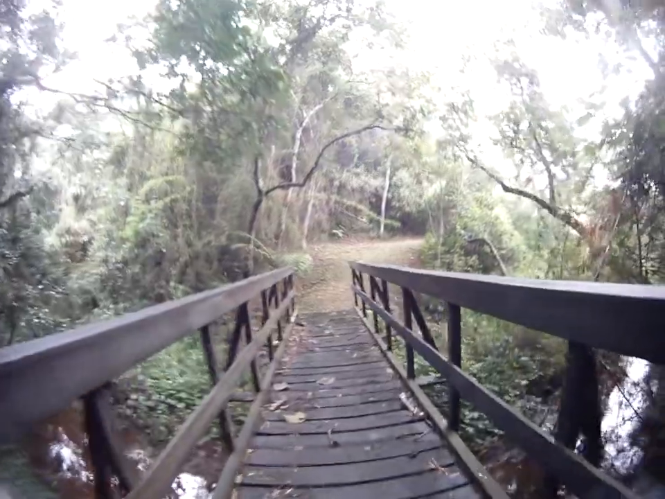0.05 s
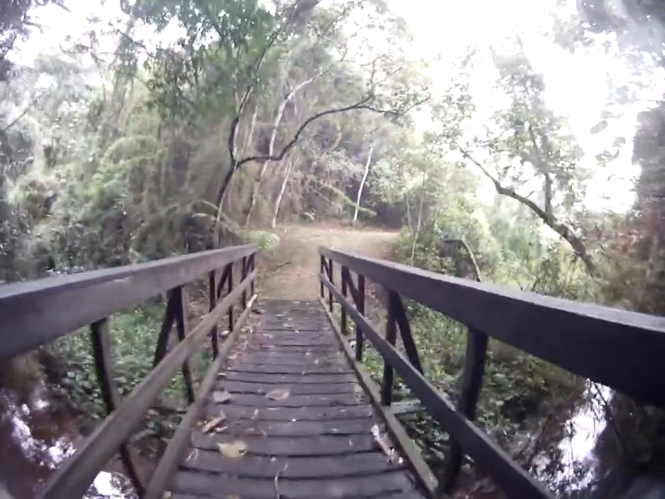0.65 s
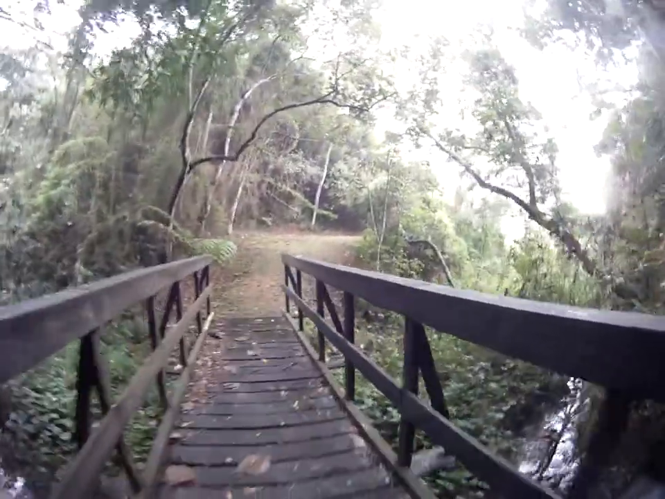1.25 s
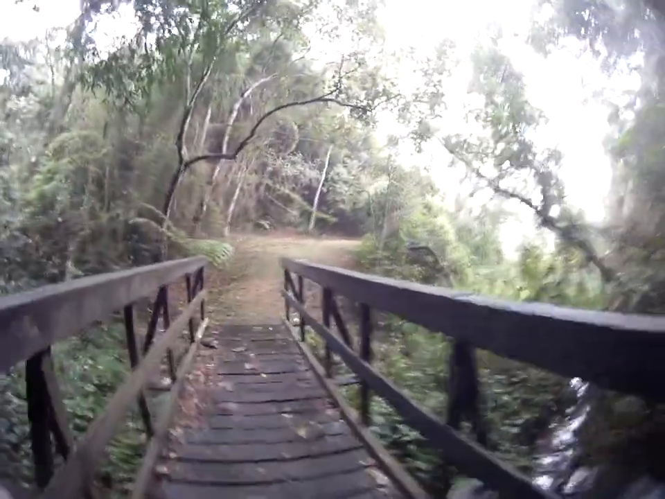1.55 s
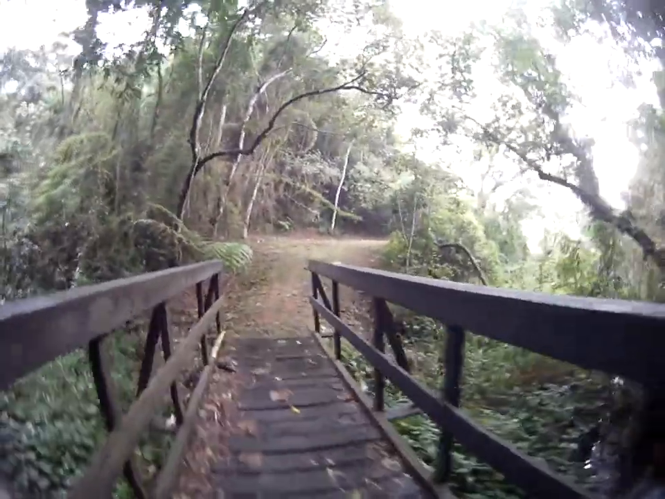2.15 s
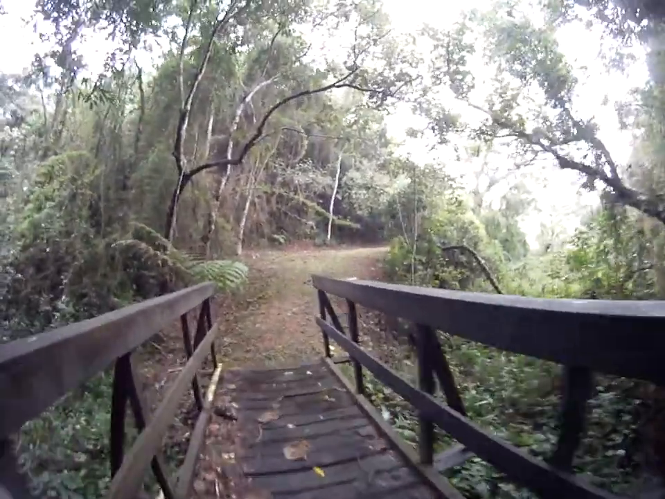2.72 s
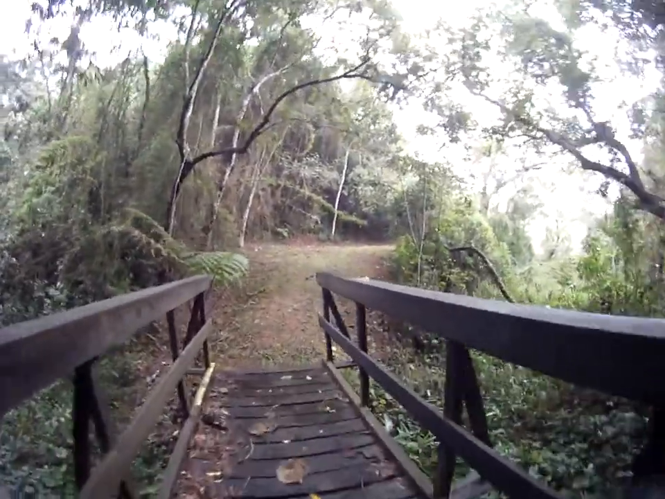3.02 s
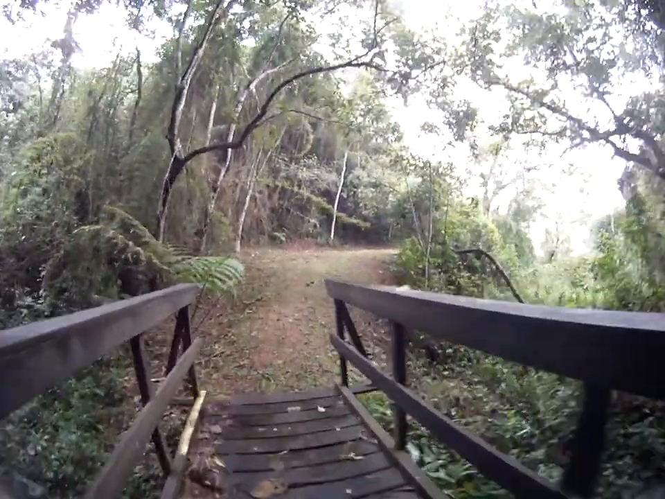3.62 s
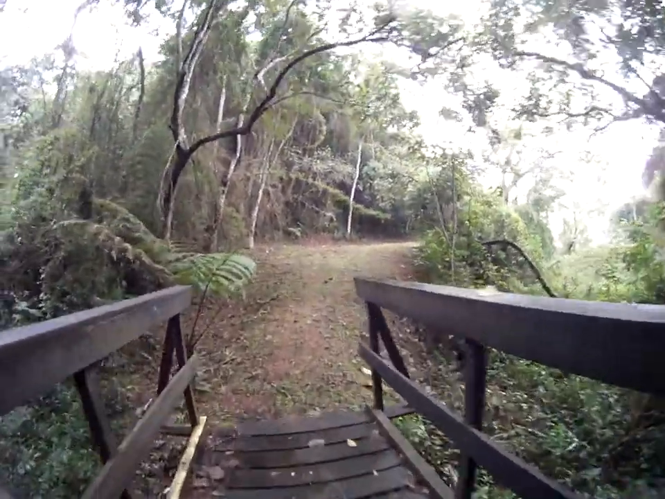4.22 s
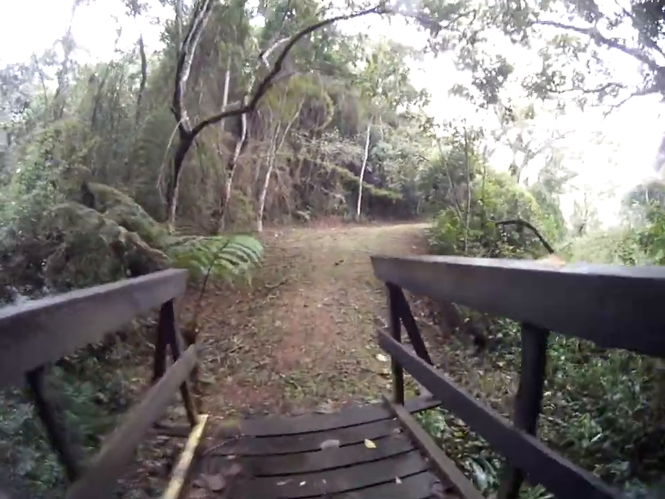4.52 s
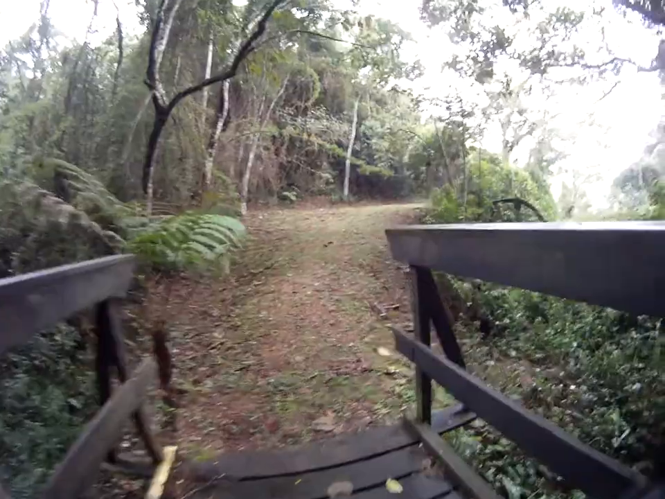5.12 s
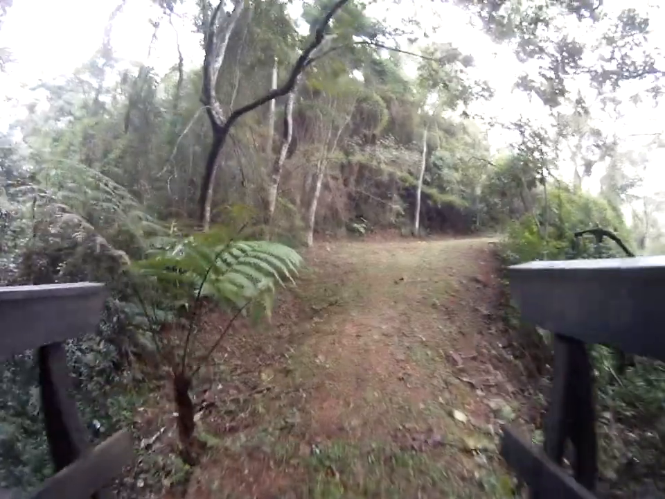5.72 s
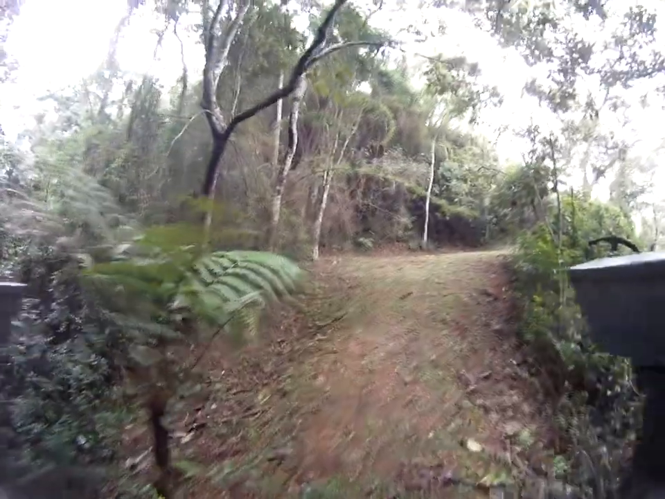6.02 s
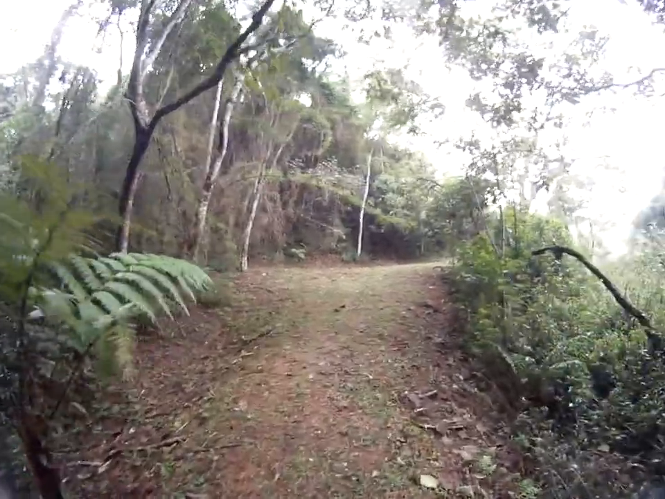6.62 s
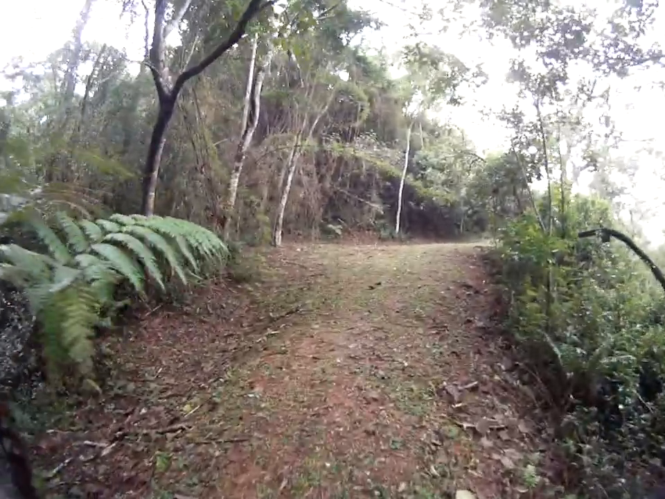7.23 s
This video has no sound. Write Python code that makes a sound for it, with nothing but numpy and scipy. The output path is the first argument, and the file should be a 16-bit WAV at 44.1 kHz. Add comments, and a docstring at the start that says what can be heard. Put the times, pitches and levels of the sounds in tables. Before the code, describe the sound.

Low rumble and faint rubbing open the sound, close at the microphone of a small camera moving over a wooden forest footbridge. A soft thud comes at about 0.5 seconds, then hard clatter from the housing and mount, and a heavier thud at 0.9. Each uneven plank gives a sharp knock with quick rebounds and a faint wooden ring. Clattering bursts follow around 1.5, 1.9, 2.5, 2.9 to 3.3, and 3.9 seconds, with gritty scuffs and an occasional small squeak between them. The loudest stretch runs from about 4.1 to 5.1 seconds: low thuds, sharp knocks, swelling rumble and a brief groan of the gear. Lighter taps and short, faint squeaks follow until 5.7. One last low thump lands at about 6.1 on the dirt trail. After that only soft rumble, slight rubbing and the faint steady hiss remain, until about 7.3 seconds.

```python
"""Low rumble and faint rubbing come first, then a thud and a close, hard clatter: a small camera
travels over a wooden footbridge in a forest and onto a dirt trail, heard at its own microphone.
Each uneven plank sets housing and mount clattering, one blow and quick rebounds; the planks ring
faintly. Bigger bumps shake the mount with a low thud. Between them the gear rubs and squeaks,
with a faint hiss behind it all."""
import sys
import numpy as np
from scipy import signal
from scipy.fft import rfft, irfft
from scipy.io import wavfile

SR = 44100
rng = np.random.default_rng(int(sys.argv[2]) if len(sys.argv) > 2 else 0)


def store_wav(level_fs):
    """Save 16-bit WAV to argv[1]."""
    pcm = np.round(np.clip(np.atleast_2d(level_fs), -1, 1) * 32767)
    wavfile.write(sys.argv[1], SR, pcm.T.astype(np.int16))


N = 320166

# knocks on the housing: t/s, level/dB, hardness/(dB per octave), favoured f/Hz, rebound hold/s, fade/s
KNOCKS = [(0.494, -50.5, -2, 440, 0, .004), (0.6333, -24.5, -3, 1045, 0.0016, 0.077),
          (0.7721, -23.5, 2.5, 960, 0.013, 0.0086), (0.7916, -19.5, 2.5, 3180, 0.0053, 0.014),
          (0.898, -30, -4.5, 1300, 0.0063, .015), (1.0702, -42, -5.5, 2000, 0.0022, 0.013),
          (1.434, -23, 2.5, 1170, 0.013, 0.01), (1.4546, -21, 1.5, 3140, 0.0043, 0.019),
          (1.642, -38.5, -2.5, 790, 0.019, 0.024), (1.7314, -46, -3, 756, 0, 0.011),
          (1.89, -37, -1.5, 910, 0.0019, 0.011), (1.8962, -23.5, 2, 940, 0, 0.039),
          (1.9306, -18.5, 3, 2120, 0.021, 0.0096), (2.398, -23.5, -1.5, 1890, 0.009, 0.028),
          (2.54, -42.5, -10, 940, 0.022, 0.037), (2.5608, -18.5, -0.5, 1700, 0.0047, 0.021),
          (2.588, -25, 0.5, 1980, 0.004, 0.037), (2.7113, -37.5, 1.5, 2350, 0, 0.046),
          (2.8729, -23, -15, 1410, 0.0014, 0.0094), (2.977, -41.5, 4, 2080, 0.0043, .005),
          (2.9956, -31.5, 2, 1060, .02, 0.02), (3.0848, -38, 0, 2150, 0.0058, 0.055),
          (3.1155, -21.5, -0.5, 1610, 0.0052, 0.02), (3.1703, -29.5, 0.5, 2000, 0, 0.021),
          (3.191, -26.5, -6, 940, 0.0049, 0.025), (3.2865, -30, 2, 974, 0.0049, 0.027),
          (3.8338, -35.5, -3, 1900, 0.018, 0.028), (3.8674, -23, -0.5, 2000, 0.0083, 0.017),
          (4.086, -35.5, -3.5, 1230, 0, 0.0033), (4.1448, -43.5, -1.5, 1340, 0.00085, 0.055),
          (4.3434, -36.5, -7.5, 1320, 0.003, 0.0023), (4.428, -39, -7.5, 540, 0.00057, 0.0068),
          (4.4678, -13, 1, 2303, 0.0043, .002), (4.6692, -31.5, -0.5, 1415, 0.011, 0.037),
          (4.8094, -20, -7, 1010, 0.0054, 0.0042), (4.825, -16.5, 0, 1050, 0.011, 0.027),
          (5.0289, -17, 0, 1420, .001, 0.031), (5.048, -29, -1.5, 1080, 0.012, 0.082),
          (5.1909, -42.5, -2.5, 776, 0.0055, .005), (5.273, -36, -0.5, 1010, 0.0033, 0.0061),
          (5.4845, -33, -4, 1080, 0.011, 0.033), (5.591, -43.5, 2, 1130, 0.018, 0.012),
          (6.1431, -36.5, -7.5, 353, 0.0026, 0.0073)]
# ring of housing and mount at every contact: f/Hz, level/dB, t60/s
HOUSING_MODES = [(210, -22.5, 0.07), (334.6, -15.5, 0.059), (518.7, -12.5, 0.082), (793.7, -7, 0.067),
                 (869, -3, 0.028), (967, -4, 0.05), (1128, -5, 0.035), (1320, -5.5, 0.031),
                 (1540, -1.5, 0.022), (1848, -10, 0.058), (2000, -1, .04), (2270, 1.5, 0.016),
                 (2470, -8, 0.028), (2623, -11.5, 0.032), (3067, -12, 0.049), (3438, -10, 0.018),
                 (3648, -16.5, 0.021), (4196, -30, 0.015), (8600, -17, 0.03), (9300, -18.5, 0.026),
                 (9800, -14.5, 0.041), (10020, -12, .028), (10100, -14, 0.029), (10760, -19.5, 0.064),
                 (12740, -24, 0.019), (14800, -14.5, 0.031), (14350, -25, .028), (15200, -29, 0.035)]
# dense, quickly dying part of a contact: f/Hz, level/dB
CRACK_SPECTRUM = [(100, -24), (680, -23), (850, -5.5), (2200, -3.5), (3500, -21), (4400, -26), (6200, -31),
                  (8000, -28.5), (9800, -14), (11100, -18), (12000, -51), (13000, -12), (14600, -17.5),
                  (15900, -46.5)]
# jolts to the mount: t/s, level/dB, pitch factor, sharpness/dB (added to upper modes and snap)
BUMPS = [(0.418, -26.5, 1.03, -4), (0.498, -26, 0.99, 3.5), (0.901, -14, 1.04, -7), (1.552, -29, 0.97, 7),
         (2.475, -28, 0.78, -14), (2.849, -35, 1.2, 21), (2.875, -34, 1.2, 33.5), (3.199, -31, 1.11, 30),
         (3.244, -42, 1.2, 28), (4.0879, -17, 0.887, 10.5), (4.3511, -8.5, 0.95, -13.5),
         (4.472, -15, 1.05, 3), (4.702, -26, 1.3, 11), (4.836, -12.5, 1.04, 5), (5.127, -28, 1.07, 6),
         (5.185, -56, 0.64, 3), (5.271, -26.5, 1.17, -16), (5.598, -31.5, 1, 5), (6.1472, -11, 1.02, -1)]
# the mount's sway: f/Hz, level/dB, t60/s
MOUNT_MODES = [(58, -34, 0.32), (88.6, -3, 0.15), (163, -20, 0.039), (205.4, -22, 0.043), (355, -30, 0.079)]
# thin metallic ring in the mount: f/Hz, level/dB, t60/s
METAL_MODES = [(11910, -40, 0.11), (12090, -41, .16)]
# bright snap of a sharp jolt: f/Hz, level/dB
SNAP_SPECTRUM = [(100, -52), (8000, -36.5), (10000, -10.5), (11000, 0), (13800, -9), (14800, -13),
                 (16000, -38)]
# planks set ringing under the camera: t/s, level/dB, pitch factor
PLANK_HITS = [(.65, -44, 0.92), (.795, -37, 1.02), (1.45, -42, 1.1), (1.655, -51, 0.9), (1.735, -53.5, 1),
              (1.944, -37, 1.02), (2.405, -47, 0.85), (2.565, -40, 1.04), (3.125, -39.5, 0.96),
              (3.295, -53, 1.1), (3.872, -39, 1.06), (5.06, -40, 0.88)]
# a plank's ring: f/Hz, level/dB, t60/s
PLANK_MODES = [(332.5, -4, 0.35), (526, -32.5, 0.16), (830, 1.5, 0.22), (1010, -22, 0.3),
               (1340, -19.5, 0.22), (2010, -9.5, 0.15)]
# how much the moving gear rubs: t/s, level/dB
RUB_LEVELS = [(0.0, -61), (0.32, -65.5), (0.68, -65), (0.83, -53.5), (1.32, -61), (1.82, -59.5),
              (2.02, -65), (2.44, -65.5), (3.14, -55), (3.29, -61), (3.65, -66), (4.72, -56), (4.88, -70.5),
              (5.06, -56.5), (6.1, -67)]
# gritty scuffs of strap and mount: t/s, length/s, level/dB
SCUFFS = [(0.063, 0.18, -59), (0.308, 0.11, -68.5), (0.893, 0.31, -56.5), (1.592, 0.062, -52.5),
          (1.656, 0.15, -60), (2.167, 0.15, -57), (2.509, 0.066, -43.5), (2.742, 0.037, -49.5),
          (2.86, 0.096, -58), (3.135, 0.088, -38), (3.516, 0.077, -56), (3.636, 0.056, -51.5),
          (4.4, 0.25, -53.5), (4.877, 0.087, -50.5), (5.204, 0.19, -54), (5.539, 0.095, -51),
          (5.664, 0.048, -49), (6.99, 0.29, -70.5)]
# squeaks and groans of the gear: t/s, length/s, level/dB, first f/Hz, last f/Hz
SQUEAKS = [(0.11, 0.073, -58, 1010, 870), (1.463, 0.075, -47.5, 930, 810), (4.149, 0.056, -61, 1250, 1430),
           (4.66, 0.13, -42, 193.4, 163.4), (5.115, 0.087, -47, 777, 948), (5.565, 0.042, -49, 967, 1207),
           (5.656, 0.0775, -49, 813, 1036), (5.712, 0.062, -52.5, 1003, 957), (7.047, 0.076, -65, 910, 776),
           (7.181, 0.04, -57.5, 950, 1010)]
# roughness of the way, heard as rumble: t/s, level/dB
RUMBLE_LEVELS = [(0.0, -52.5), (0.46, -57.5), (0.62, -52), (0.99, -44), (1.37, -55.5), (1.86, -51),
                 (2.3, -55.5), (2.91, -49.5), (3.58, -59.5), (4.12, -56), (4.53, -38.5), (4.85, -53.5),
                 (5.22, -44), (5.84, -59), (6.14, -57), (6.59, -63.5), (6.89, -62.5), (7.26, -51.5)]
# handling rumble at the microphone: f/Hz, level/dB
RUMBLE_SPECTRUM = [(15, -26), (30, -7), (55, 3.5), (85, 5.5), (120, -10), (170, -14), (220, -18),
                   (300, -25.5), (450, -21.5), (900, -35.5), (3000, -78.5)]
# forest and microphone hiss: f/Hz, level/dB
HISS_SPECTRUM = [(100, 9.5), (600, -1), (1500, -11.5), (2100, -3.5), (5300, -12.5), (6000, -22.5),
                 (6900, -14), (10000, -16), (11000, -21), (12200, -25.5), (13200, -20.5), (14300, -12),
                 (15200, -26.5), (15700, -43)]


def knocks(blow_chatter=0.43, rebound_chatter=0.86, chatter_s=0.0029, firm_db=-17, choke_db_per_s=280):
    """Right at the microphone, a hard blow and its chattering rebounds ring one spot of the housing."""
    out = np.zeros(N)
    count, size = 12, 3072  # contacts in a knock, samples in a contact
    t = np.arange(size) / SR
    is_blow = (np.arange(count) == 0)[:, None]
    for s, db, hardness, focus_hz, hold_s, fade_s in KNOCKS:
        buzz = rng.standard_normal((count, size)) * np.exp(-(t / chatter_s) ** 4)
        buzz /= np.linalg.norm(buzz, axis=1, keepdims=True)
        force = (t == 0) + np.where(is_blow, blow_chatter, rebound_chatter) * buzz
        rung = signal.fftconvolve(force, housing(size)[None], axes=1)[:, :size]
        tilt_db = hardness + np.where(is_blow, 0.75, -0.75)  # the blow is brighter than its rebounds
        focus_db = 4.5 + 0.46 * max(firm_db - db, 0)  # light taps favour their one resonance more
        contacts = contact_colour(rung, tilt_db, focus_hz, focus_db)
        firmness = max(db - firm_db, 0)  # the firmest hits press the parts together and choke the ring
        contacts *= amp(-choke_db_per_s * firmness * t)
        for contact, delay, rebound_db in zip(contacts, *rebounds(hold_s, fade_s, count)):
            attack_rms = np.sqrt(np.mean(contact[t < .006] ** 2))
            add(out, s + delay, amp(db + rebound_db) * contact / attack_rms)
    return out


def rebounds(hold_s, fade_s, count, gap_s=0.0058, scatter_db=1.4, fade_db=26):
    """Delays/s and levels/dB of a blow and a loose part's uneven rebounds, which hold, then die."""
    gaps = gap_s * (1 + 0.4 * rng.uniform(-1, 1, count - 1))
    delay = np.cumsum(gaps)
    db = -1.5 + scatter_db * rng.standard_normal(count - 1)
    db -= fade_db * np.maximum(delay - hold_s, 0) / fade_s
    return np.append(0, delay), np.append(0, db)


def housing(size, pitch_spread=0.013, uneven_db=1.9, crack_db=-7, crack_t60=0.026):
    """Housing and mount answer a contact with a crack and modes that vary a little from spot to spot."""
    modes = ring(HOUSING_MODES, size, 1 + pitch_spread * rng.standard_normal(len(HOUSING_MODES)))
    strengths = amp(uneven_db * rng.standard_normal(len(modes)))
    signs = (-1) ** np.arange(len(modes))
    tones = (signs * strengths) @ modes
    crack = burst(CRACK_SPECTRUM, size, crack_t60)
    return unit_rms(tones) + amp(crack_db) * unit_rms(crack)


def contact_colour(x, tilt_db, focus_hz, focus_db, low_hz=250, high_hz=3200, width_hz=130):
    """A soft contact loses treble, and the spot it hits favours one resonance."""
    hz = abs(np.fft.fftfreq(x.shape[-1], 1 / SR))
    db = tilt_db * np.log2(np.hypot(hz, low_hz) / np.hypot(hz, high_hz))
    db += focus_db / (1 + ((hz - focus_hz) / width_hz) ** 2)
    minimum_phase = np.exp(np.conj(signal.hilbert(np.log(amp(db)))))  # nothing rings before the hit
    return np.fft.ifft(np.fft.fft(x) * minimum_phase).real


def thuds(rise_s=0.0021, snap_db=-39, snap_t60=0.05, metal_db=-5):
    """A jolt sways the mount under the microphone; a sharp one also wakes its upper modes and snaps."""
    out = np.zeros(N)
    size = SR // 3
    push = 1 - np.exp(-np.arange(size) / SR / rise_s)
    is_upper = np.arange(len(MOUNT_MODES)) >= 2
    metal = amp(metal_db) * ring(METAL_MODES, size).sum(0)
    for s, db, pitch, sharp_db in BUMPS:
        sway = amp(sharp_db * is_upper) @ ring(MOUNT_MODES, size, pitch)
        snap = amp(snap_db + sharp_db) * burst(SNAP_SPECTRUM, size, snap_t60)
        add(out, s, amp(db) * (push * sway + metal + snap))
    return out


def planks():
    """The bridge rings faintly below the camera: every plank has the same modes at its own pitch."""
    out = np.zeros(N)
    for s, db, pitch in PLANK_HITS:
        add(out, s, amp(db) * ring(PLANK_MODES, SR // 2, pitch).sum(0))
    return out


def rubbing(slips_per_s=2500, spots=4, gain_db=-0.5, flutter_db=2.5, still_db=-68, soft_hz=10000):
    """Countless tiny slips ring the housing close up: soft as the camera moves, gritty in the scuffs."""
    grit, scuff_gain = np.zeros((2, N))
    for _ in range(spots):
        slips = (rng.random(N) < slips_per_s / spots / SR) * rng.standard_normal(N)
        grit += signal.oaconvolve(slips, housing(4096))[:N]
    soft = signal.lfilter(*signal.butter(1, soft_hz, fs=SR), grit)
    motion = gain_curve(RUB_LEVELS)
    motion /= 1 + (amp(still_db) / motion) ** 2  # hardly any slipping when almost still
    flutter = amp(gain_db + flutter_db * drift(rate_hz=25))
    for s, length, db in SCUFFS:
        add(scuff_gain, s, amp(db) * np.hanning(round(length * SR)))
    gritty = contact_colour(grit, tilt_db=-0.5, focus_hz=3600, focus_db=10)
    return flutter * motion * unit_rms(soft) + scuff_gain * unit_rms(gritty)


def squeaks(waver=0.026, octave_db=-11):
    """The gear sticks and slips near the microphone: an unsteady gliding tone with a weak octave."""
    out = np.zeros(N)
    for s, length, db, first_hz, last_hz in SQUEAKS:
        size = round(length * SR)
        hz = np.linspace(first_hz, last_hz, size) * (1 + waver * drift(rate_hz=443)[:size])
        phase = 2 * np.pi * np.cumsum(hz) / SR
        tone = np.sin(phase) + amp(octave_db) * np.sin(2 * phase)
        add(out, s, amp(db) * unit_rms(tone) * np.hanning(size))
    return out


def rumble(gain_db=2, lumps_db=2):
    """Lumpy handling rumble, carried from bridge and trail through the mount to the microphone."""
    lumps = amp(gain_db + lumps_db * drift(rate_hz=18))
    return lumps * gain_curve(RUMBLE_LEVELS) * noise(RUMBLE_SPECTRUM, N)


def hiss(level_db=-63.5):
    """Faint steady hiss of the surrounding forest and the microphone itself."""
    return amp(level_db) * noise(HISS_SPECTRUM, N)


def ring(modes, size, pitch=1):
    """A body's answer to one blow: a damped sine for each mode, one to a row."""
    t = np.arange(size) / SR
    hz, db, t60 = np.transpose(modes)[:, :, None]
    hz = hz * np.reshape(pitch, (-1, 1))
    return amp(db - 60 * t / t60) * np.sin(2 * np.pi * hz * t)


def noise(spectrum, size):
    """Noise of unit RMS with a spectrum drawn on a log-frequency axis."""
    corner_hz, corner_db = np.transpose(spectrum)
    hz = np.fft.rfftfreq(size, 1 / SR)
    db = np.interp(np.log(hz + 1), np.log(corner_hz), corner_db)
    return unit_rms(irfft(rfft(rng.standard_normal(size)) * amp(db), size))


def burst(spectrum, size, t60):
    """Coloured noise that falls by 60 dB in t60 seconds."""
    t = np.arange(size) / SR
    return noise(spectrum, size) * amp(-60 * t / t60)


def drift(rate_hz):
    """Smooth random wander of unit RMS."""
    t = np.arange(N) / SR
    return unit_rms(np.interp(t * rate_hz, np.arange(4000), rng.standard_normal(4000)))


def gain_curve(levels):
    """Gain at every sample from rows of t/s, level/dB."""
    return amp(np.interp(np.arange(N) / SR, *np.transpose(levels)))


def amp(db):
    return 10 ** (np.asarray(db) / 20)


def unit_rms(x):
    return x / np.sqrt(np.mean(x ** 2) + 1e-20)


def add(mix, start_s, sound):
    part = mix[max(round(start_s * SR), 0):][:len(sound)]
    part += sound[:len(part)]


def scene():
    """Gear up close, planks below and forest behind, in mono at the camera's microphone."""
    return (knocks() + planks() + rubbing() + squeaks() + thuds() + rumble() + hiss())[None]


def record(dry, dip_hz=6050, dip_q=6, dip_share=0.33, edge_hz=15900):
    """The camera takes the sound with a narrow dip in the treble and a steep upper band limit."""
    notched = signal.lfilter(*signal.iirnotch(dip_hz, dip_q, fs=SR), dry)
    dipped = dry + dip_share * (notched - dry)
    lowpass = signal.firwin(255, edge_hz, window=("kaiser", 9), fs=SR)
    return signal.oaconvolve(dipped, lowpass[None], "same")


dry = scene()
out = record(dry)
store_wav(out)
```